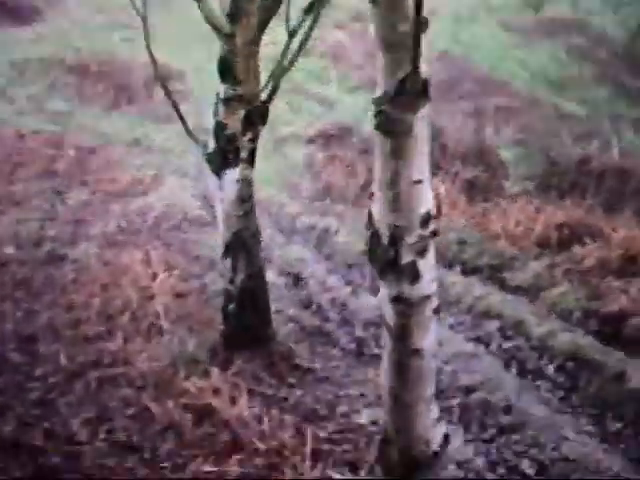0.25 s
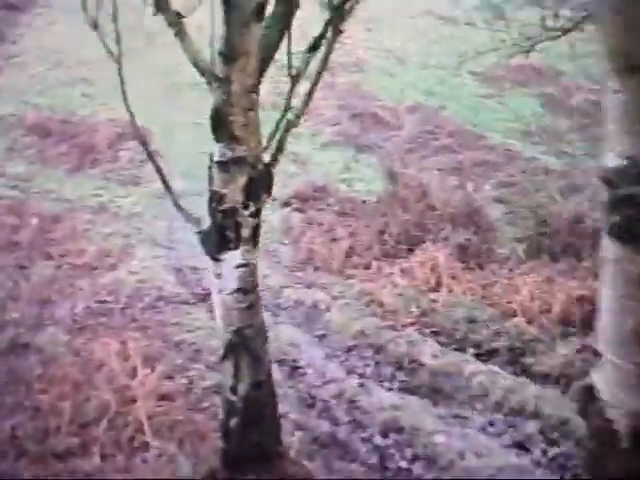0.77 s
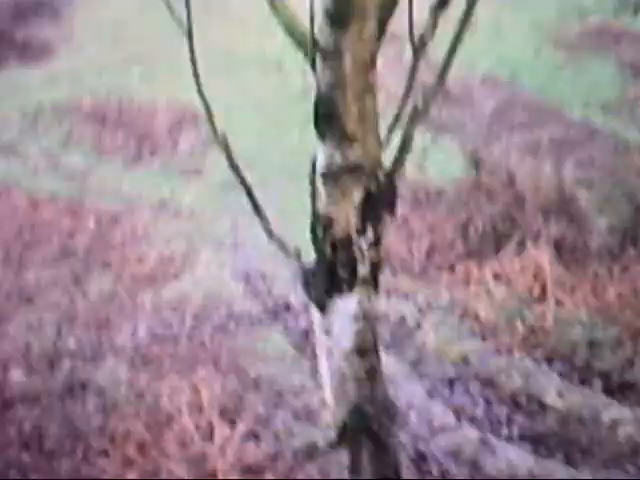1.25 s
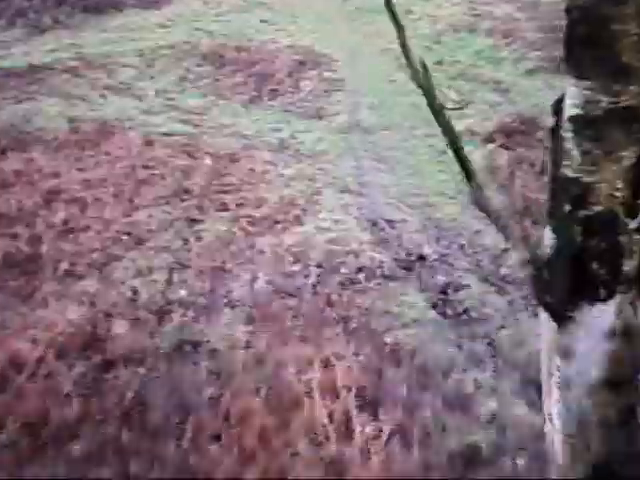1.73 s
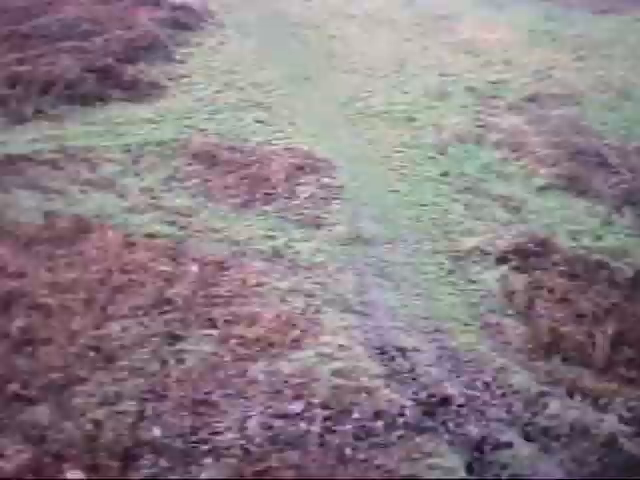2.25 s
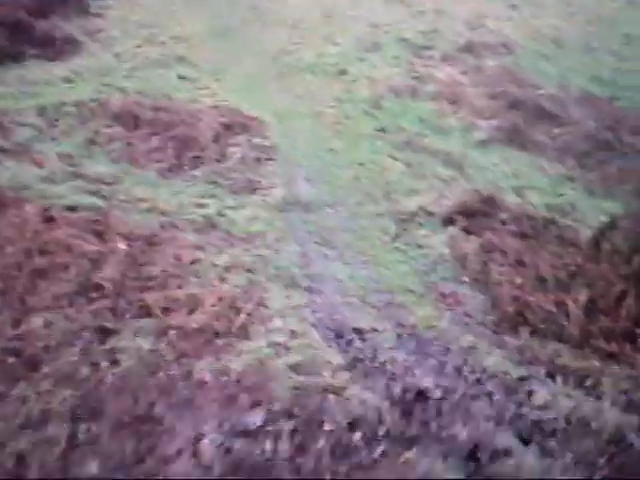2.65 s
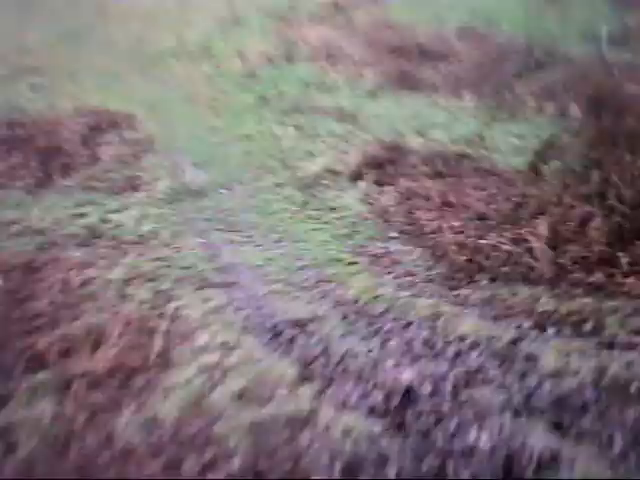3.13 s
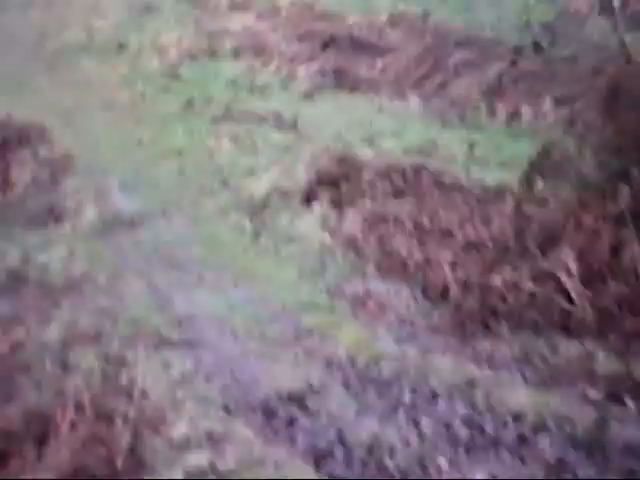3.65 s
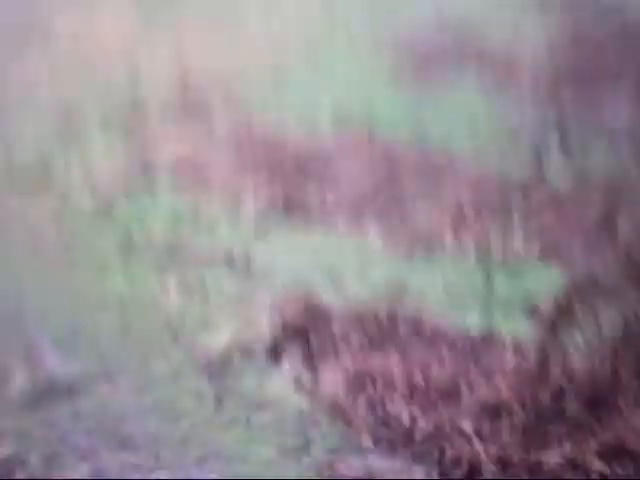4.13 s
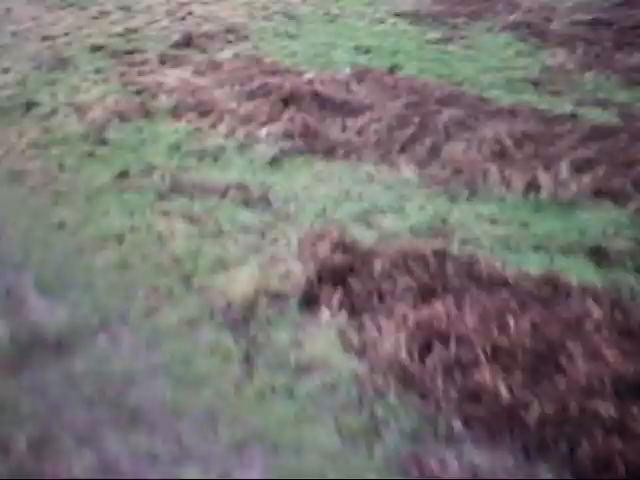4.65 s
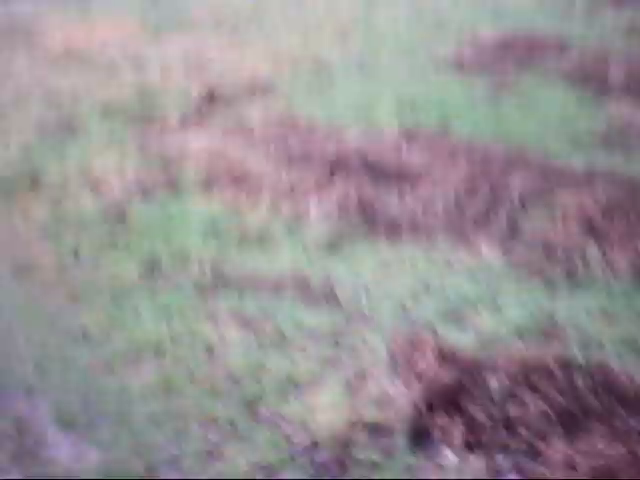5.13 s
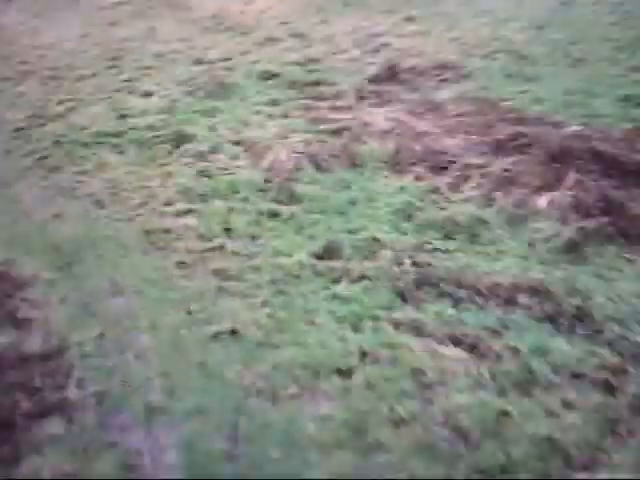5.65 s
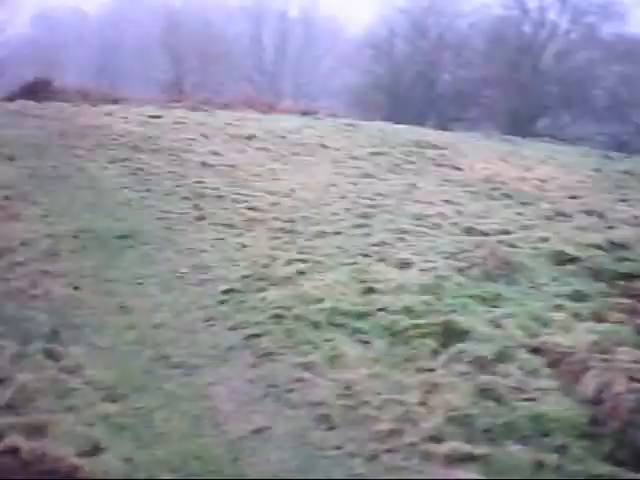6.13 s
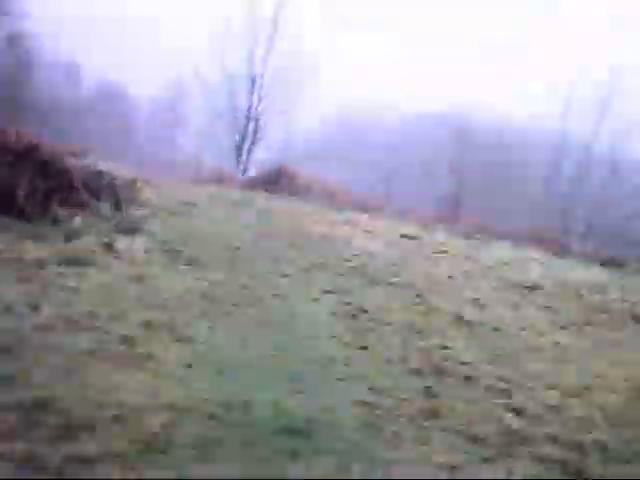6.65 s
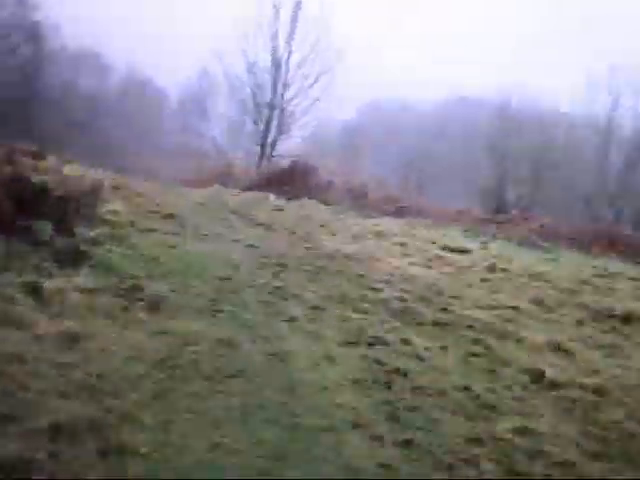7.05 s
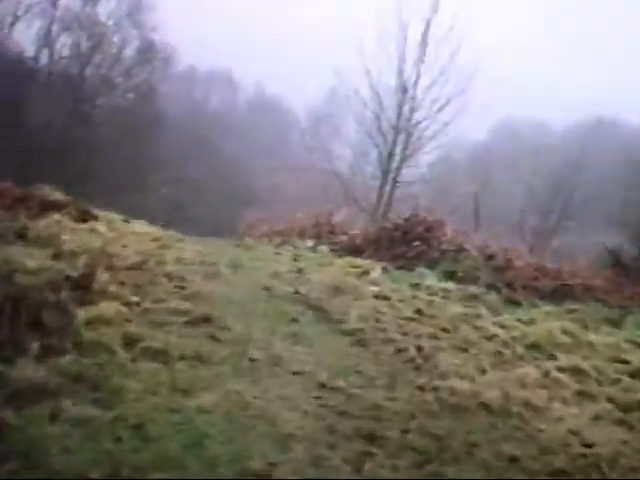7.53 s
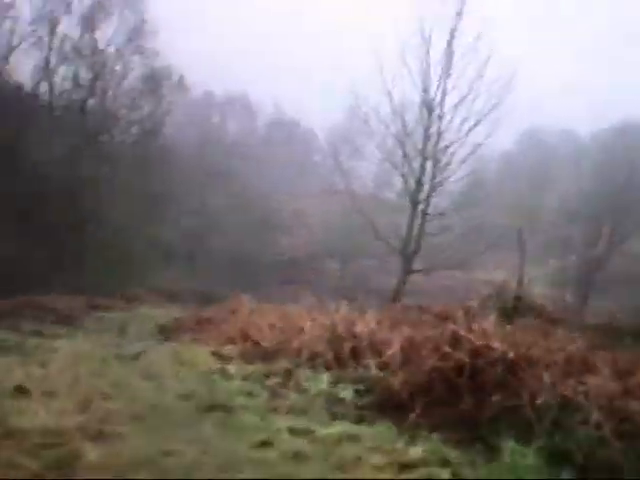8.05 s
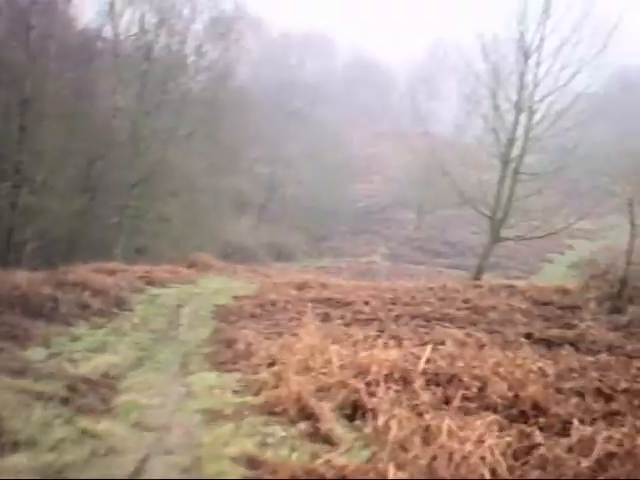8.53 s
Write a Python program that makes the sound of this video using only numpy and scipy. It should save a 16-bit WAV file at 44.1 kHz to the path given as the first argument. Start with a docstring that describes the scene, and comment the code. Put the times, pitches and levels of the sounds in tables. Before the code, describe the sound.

A small camera clatters in its mount on a bumpy bike ride, harsh and lo-fi, before the blows stop and wind rushes over constant hiss.

```python
"""A small camera knocks in its mount on a mountain bike over a rough trail, often with bounces.
Each knock rings damped modes of the plastic case, with a noise rattle and a sharp tick; the case also rubs in its mount.
Under this lie lumpy frame rumble, air rush over the microphone hole and steady amplifier hiss, all filtered noise.
The camera clips the hardest blows, samples near 8 kHz and holds each sample, which mirrors all sound into the treble."""
import sys
import numpy as np
from scipy import signal
from scipy.fft import rfft, irfft, next_fast_len
from scipy.io import wavfile
from scipy.ndimage import uniform_filter1d, map_coordinates

SR = 44100
rng = np.random.default_rng(int(sys.argv[2]) if len(sys.argv) > 2 else 0)


def digitize_waveform(pressure):
    """Quantize a signal to 16-bit integers and store it at the path in sys.argv[1].

    Rows of a 2-D input are taken as channels; values are limited to [-1, 1].
    """
    field = np.atleast_2d(pressure).T
    bounded = np.clip(field, -1, 1)
    quanta = np.round(bounded * 32767).astype(np.int16)
    wavfile.write(sys.argv[1], SR, quanta)


N = 387198
T = np.arange(N) / SR

# knocks in the mount: start_s, strength_db, thud_db (extra below 500 Hz), bright_db (extra, glancing blow)
KNOCK_EVENTS = [(0.159, -36.5, 17.5, 9), (1.0518, -29, 14, 5), (1.2018, -20.5, 8, 11),
                (1.23, -37.5, 20, -3), (1.3933, -30, 14, 9.5), (1.5396, -26, 10.5, 7),
                (1.6227, -13, 2.5, 1.5), (1.6513, -19, 2, 2), (1.9683, -20, 8.5, 8.5),
                (2.041, -35, 25.5, -3), (2.0514, -7, 2.5, 2.5), (2.1867, -14, 3, 12), (2.1948, -29, 21, -4),
                (2.2077, 3.5, 0.5, 0), (2.2217, -3, 4.5, 1), (2.4519, -7, 0.5, -0.5),
                (2.5715, -16, 10, 12.5), (2.597, -19, 2, 4), (2.7824, -18, 7.5, 10), (2.8149, 0.5, 3.5, 2),
                (2.867, -28.5, -4, 12), (2.976, -24, 4, 1), (3.0061, -2.5, 2.5, 0.5), (3.158, -22, 13, 8),
                (3.1816, 0.5, 12.5, 5.5), (3.1892, -7.5, 8.5, 2.5), (3.8638, -4, -2.5, 2.5),
                (3.8798, -5, 2, 2.5), (4.0882, -12.5, 3, 6), (4.0941, -22, -13, 9),
                (4.1097, -2.5, 1.5, 0.5), (4.2536, -13.5, 4.5, 5), (4.2631, -22, 0, 0), (4.285, -4, 2, 0.5),
                (4.439, -11, 3, 7), (4.4582, 0.5, 0.5, -0.5), (4.469, -11, 9.5, 3), (4.6249, -10, 3, 6.5),
                (4.6337, -22, -9, 0), (4.6571, -7, 1.5, -1.5), (4.789, -20.5, 6, 1), (4.8062, -7, 6, -0.5),
                (4.8912, -14, 6, 10), (4.901, 4, 3.5, 4), (4.9146, -5.5, 5.5, -1), (5.0456, -4.5, 3.5, 4.5),
                (5.0588, 3.5, 2, 2), (5.0649, -0.5, 7.5, 4.5), (5.195, -7, 6, 9.5), (5.2028, 6, -3, 2),
                (5.2138, -8.5, 3, -4), (5.2253, -19.5, 2, -1), (5.3438, -17, 5, 10.5), (5.358, -4, 2, 0.5),
                (5.4134, -6.5, 4, 1.5), (5.5739, -4, 3, 0.5), (5.6563, 1, 2.5, 0.5),
                (5.8035, -0.5, 2.5, -0.5), (6.0327, -14.5, 6.5, 11.5), (6.0578, -4.5, 1.5, 2.5),
                (6.2294, -18.5, 7.5, 1), (6.3083, -16.5, 10, 9.5), (6.3216, 0.5, 1.5, 2.5),
                (6.421, -29.5, 12, -3), (6.6407, -30, 10, 6), (6.6619, -5, 1.5, 2), (7.9921, -19, -1, 2),
                (8.113, -22, 7, 6.5)]
# resonances of the rubbing, rattling case: centre_hz, width_hz, level_db
RUB_PEAKS = [(818, 247, 0), (1142, 122, 4), (1279, 116, 3.5)]
# spectrum of the frame: freq_hz, level_db (relative, per Hz)
RUMBLE_SPECTRUM = [(20, 3.5), (50, -17), (100, -4), (145, 3.5), (200, -6.5), (260, -10.5), (400, -20),
                   (800, -21), (2000, -65.5)]


def amp(db):
    """Gain of a level in dB."""
    return 10 ** (np.asarray(db) / 20)


def unit(x):
    """Scale to rms 1."""
    return x / np.sqrt(np.mean(x ** 2))


def wobble(knots_per_s):
    """Smooth random curve through normal-distributed knots."""
    knots = rng.standard_normal(int(N * knots_per_s / SR) + 4)
    return map_coordinates(knots, [T * knots_per_s])


def filtered(x, response):
    """Filter x by a complex response of frequency, zero-padded against wrap-around."""
    size = next_fast_len(len(x) + 8192)
    spectrum = rfft(x, size) * response(np.fft.rfftfreq(size, 1 / SR))
    return irfft(spectrum, size)[:len(x)]


def shape(points):
    """Gain response through (freq_hz, level_db) points on a log frequency axis."""
    point_hz, point_db = np.transpose(points)
    return lambda hz: amp(np.interp(np.log(hz + 1), np.log(point_hz), point_db))


def resonances(peaks):
    """Causal sum of second-order bandpasses of alternating sign."""
    def response(hz):
        total = 0
        for k, (centre_hz, width_hz, db) in enumerate(peaks):
            damping = 1j * hz * width_hz
            total = total + (-1) ** k * amp(db) * damping / (centre_hz ** 2 - hz ** 2 + damping)
        return total
    return response


def noise(response, patchy_db):
    """Coloured noise of rms 1; time-frequency patches vary in gain before the filter."""
    z = signal.stft(rng.standard_normal(N), nperseg=512)[2]
    field = uniform_filter1d(rng.standard_normal(z.shape), size=4, axis=0)
    field = uniform_filter1d(field, size=8, axis=1)
    patchy = signal.istft(z * amp(patchy_db * unit(field)), nperseg=512)[1][:N]
    return unit(filtered(patchy, response))


def swells(rows):
    """Sum of Gaussian swells given as (centre_s, peak_db, length_s)."""
    out = np.zeros(N)
    for centre_s, db, length_s in rows:
        near = slice(max(round((centre_s - 2 * length_s) * SR), 0), round((centre_s + 2 * length_s) * SR))
        out[near] += amp(db) * np.exp(-.5 * ((T[near] - centre_s) / (length_s / 3)) ** 2)
    return out


def ride():
    """Tyre rumble comes lumpy up the frame; the air stream sounds the cavity behind the microphone hole."""
    # start_s, rumble_db, rush_db
    ride_levels = [(0.0, -60, -51.5), (0.78, -54.5, -60), (1.15, -47, -54), (1.6, -50.5, -55),
                   (2.1, -46, -50.5), (2.7, -44.5, -50), (3.2, -40.5, -51), (3.4, -52, -56),
                   (3.75, -48.5, -48.5), (4.4, -47, -49.5), (5.0, -46, -44.5), (5.5, -40.5, -44.5),
                   (5.97, -44, -40), (6.7, -45.5, -38), (7.16, -45.5, -40), (7.75, -49, -43),
                   (8.0, -49, -46), (8.41, -51, -56.5), (8.78, -52.5, -56)]
    # cavity resonances: centre_hz, width_hz, level_db
    hole_peaks = [(653, 90, -8), (890, 127, -7), (1064, 64, 2), (1310, 177, -3.5), (1992, 186, -12.5),
                  (2790, 640, -19.5)]
    level_s, rumble_db, rush_db = np.transpose(ride_levels)

    # the frame shudders around each knock
    shake = swells((at_s, -42 + 0.7 * db, 0.039) for at_s, db, *_ in KNOCK_EVENTS)
    lumps = amp(0.9 * wobble(14) + 1.2 * wobble(40))
    rumble_gain = amp(np.interp(T, level_s, rumble_db)) + shake
    rumble = rumble_gain * unit(lumps * noise(shape(RUMBLE_SPECTRUM), patchy_db=0.3))

    eddies = amp(0.5 * wobble(10) + 0.9 * wobble(70))
    rush_gain = amp(np.interp(T, level_s, rush_db)) + amp(-10.5) * shake
    rush = rush_gain * unit(eddies * noise(resonances(hole_peaks), patchy_db=2.0))
    return rumble + rush


def amplifier_hiss():
    """Steady coloured noise of the microphone amplifier."""
    # freq_hz, level_db (relative, per Hz)
    hiss_spectrum = [(20, -7.5), (150, 0), (500, -7), (1000, -9), (2000, -11.5), (3300, -12), (3700, -13.5),
                     (4000, -20.5), (4400, -70)]
    return amp(-46) * noise(shape(hiss_spectrum), patchy_db=0.1)


def knocks():
    """Every blow rings the same modes at slightly new strengths; a rattle and a sharp tick ride on top."""
    # modes of the case: freq_hz, level_db, t60_s
    case_modes = [(162, -10.5, 0.0393), (242.3, -15, 0.044), (314, -23.5, 0.012), (684, -2, 0.04),
                  (822, -0.18, 0.03), (1110.5, -3.5, 0.033), (1175, -10.5, 0.029), (1288, -17, 0.043)]
    # stiff walls: centre_hz, width_hz, level_db
    tick_peaks = [(2030, 77, -15), (2700, 212, 8), (3470, 210, 4)]
    # ticks with no knock: start_s, level_db
    bare_ticks = [(0.082, -21), (0.105, -31)]
    blow_s = 0.001
    t = T[:SR // 10]
    hz, mode_db, t60_s = np.transpose(case_modes)
    whole_body = hz < 500

    # the case as a whole recoils against the first swing of its walls
    sign = np.where(whole_body, -1, 1)[:, None]
    decay = amp(-60 * t / t60_s[:, None])
    swings = sign * decay * np.sin(2 * np.pi * hz[:, None] * t)
    swings[~whole_body] *= 1 - np.exp(-t / 0.00051)  # the walls take a swing or two to build up
    tick_envelope = amp(-60 * t / 0.015) * (1 - np.exp(-t / 0.00063))
    rattle_attack = 1 - np.exp(-t / 0.0011)

    case, rattle, tick = np.zeros((3, N + SR))
    for start_s, db, thud_db, bright_db in KNOCK_EVENTS:
        start = round(start_s * SR)
        span = slice(start, start + len(t))
        tilt_db = np.select([whole_body, hz > 1000], [thud_db, bright_db], 0)
        strengths = amp(db + mode_db + tilt_db + rng.normal(0, 0.59, len(hz)))
        case[span] += strengths @ swings
        rattle_envelope = amp(db + bright_db - 8.5 - 60 * t / 0.06) * rattle_attack
        rattle[span] += rattle_envelope * rng.standard_normal(len(t))
        tick_db = db - 8.5 - 0.34 * bright_db  # hard, square blows tick most
        tick[span] += amp(tick_db) * tick_envelope * rng.standard_normal(len(t))
    for start_s, db in bare_ticks:
        tick[round(start_s * SR):][:len(t)] += amp(db) * tick_envelope * rng.standard_normal(len(t))

    blow = np.hanning(round(blow_s * SR) + 1)  # a soft contact dulls the ring
    dulled = np.convolve(case, blow / blow.sum())[:N]
    ring = filtered(dulled, lambda f: (1j * f / (90 + 1j * f)) ** 2)  # the microphone misses slow sway
    return ring + filtered(rattle[:N], resonances(RUB_PEAKS)) + filtered(tick[:N], resonances(tick_peaks))


def scuffs():
    """Short rubs sound the case's upper modes and shove it bodily; the harder, the shorter."""
    # rubs in the mount, mostly on the rebound from a knock: centre_s, level_db
    scuff_events = [(0.137, -48), (1.131, -43), (1.667, -37), (1.777, -43), (2.106, -49), (2.138, -38),
                    (2.536, -46), (2.65, -37.5), (2.763, -56), (2.783, -36), (2.901, -42), (3.175, -16.5),
                    (3.249, -34.5), (3.294, -41), (3.396, -48), (3.792, -48), (3.872, -23), (3.959, -38.5),
                    (4.061, -53), (4.174, -32.5), (4.232, -40), (4.356, -39.5), (4.528, -30),
                    (4.725, -40.5), (4.969, -36.5), (5.123, -32), (5.205, -14), (5.462, -37.5),
                    (5.62, -37.5), (5.711, -35), (5.804, -26.5), (8.036, -34), (8.066, -53)]
    length_at_0_db_s, shortening_db_per_db = 0.008, 0.37
    rows = [(at_s, db, length_at_0_db_s * amp(-shortening_db_per_db * db)) for at_s, db in scuff_events]
    rub = swells(rows)
    # the shove grows more slowly than the rub
    shove = swells((at_s, -21 + 0.5 * db, length_s) for at_s, db, length_s in rows)
    grain = amp(0.54 * wobble(160))
    rubbing = noise(resonances(RUB_PEAKS), patchy_db=1)
    swaying = noise(shape(RUMBLE_SPECTRUM), patchy_db=1)
    return rub * unit(grain * rubbing) + shove * swaying


def scene():
    """Knocks, rubs and the ride over the steady hiss of the microphone amplifier."""
    return (ride() + amplifier_hiss() + knocks() + scuffs())[None]


def record(dry):
    """A slow sampler clips at its rails and holds each value; a band limit follows."""
    hold_hz, top_hz = 8012.3, 15500
    x = filtered(dry[0], lambda hz: 1 / (1 + (hz / 4200) ** 12))
    sample_s = np.arange(int(N * hold_hz / SR) + 1) / hold_hz
    samples = np.interp(sample_s, T, x)
    deep = samples < -1.34
    samples = np.clip(samples, -0.97, 0.97)
    # the converter drops the first value of a trough far past the rail
    samples[deep & ~np.roll(deep, 1)] = -0.26
    held = samples[(T * hold_hz).astype(int)]
    return filtered(held, lambda hz: hz < top_hz)[None]


dry = scene()
out = record(dry)
digitize_waveform(out)
```